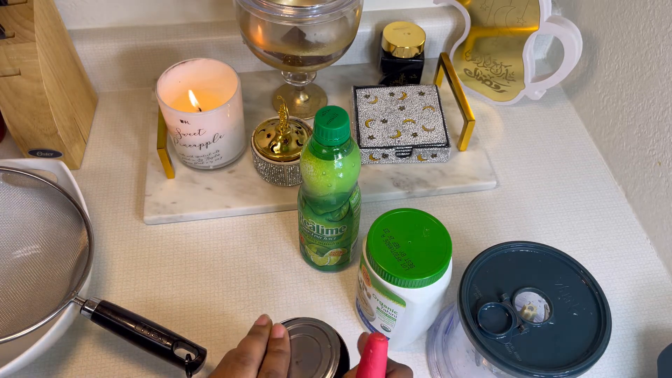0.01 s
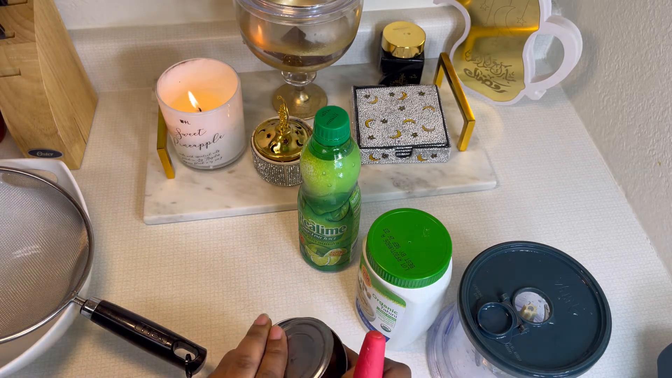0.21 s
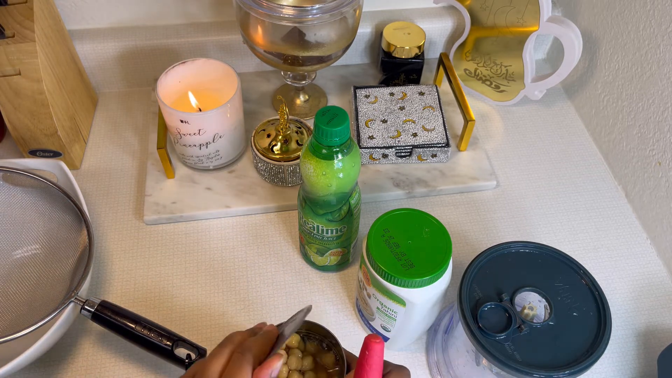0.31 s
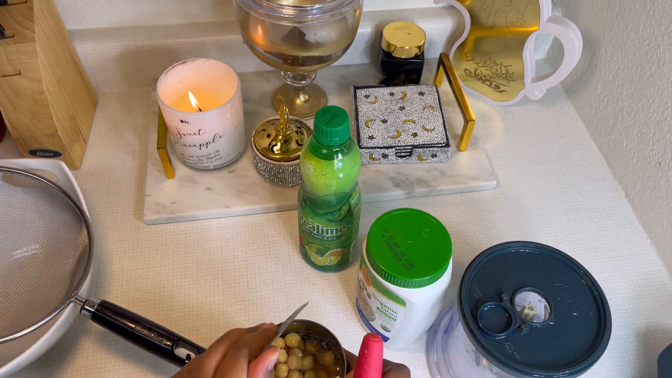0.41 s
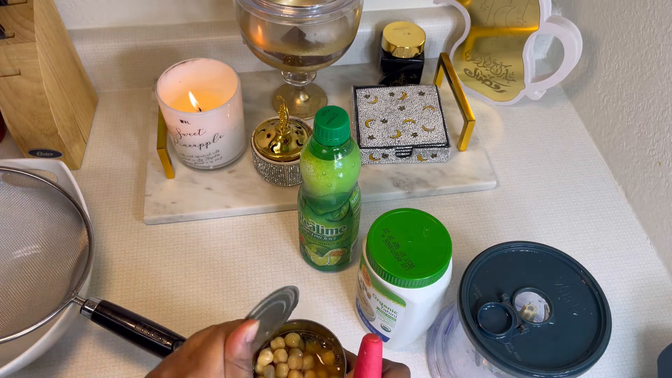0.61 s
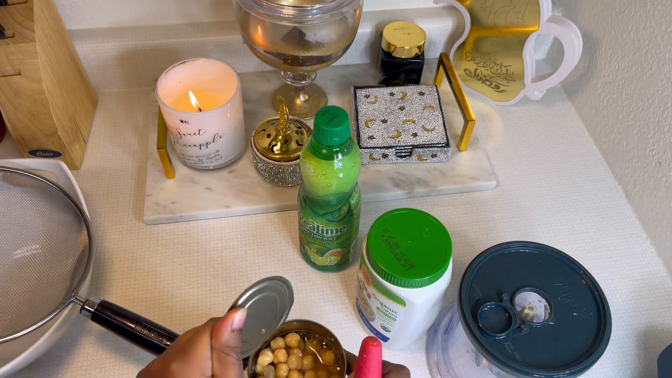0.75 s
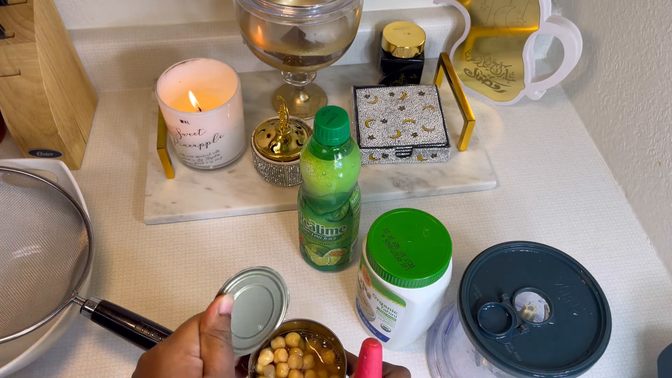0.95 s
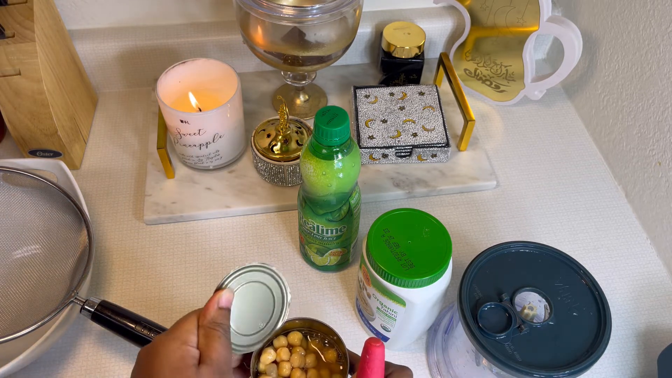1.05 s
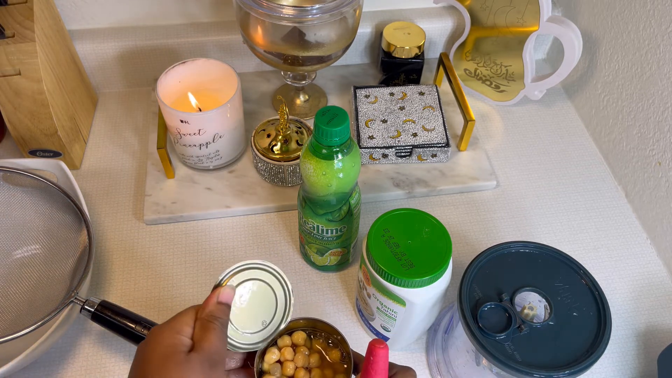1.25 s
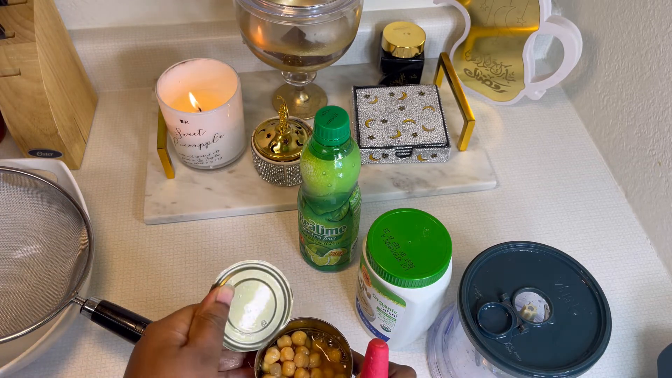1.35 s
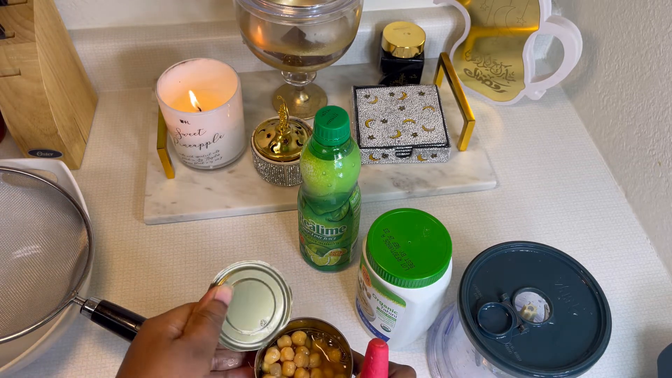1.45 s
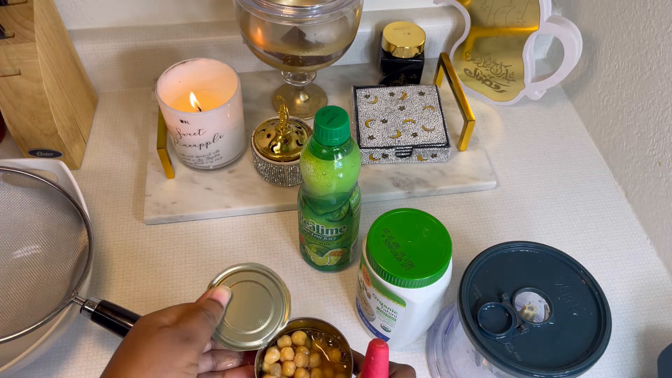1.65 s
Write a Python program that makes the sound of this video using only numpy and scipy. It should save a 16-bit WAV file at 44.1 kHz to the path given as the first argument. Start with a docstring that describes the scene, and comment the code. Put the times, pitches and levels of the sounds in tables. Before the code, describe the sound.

A can lid's last tab snaps as it is bent back, close to a stereo microphone in a quiet kitchen. Very faint touches come near 0.05 s; at 0.25 s a loud, sharp crack of several rapid jolts rings briefly with tearing grit, a low thump and decaying room echo. A soft tick and faint finger rub follow at 0.73-1.05 s, over low, wavering refrigerator hum and room tone to the end.

```python
"""The cut lid of a tin can is bent back by hand, close to a stereo microphone in a quiet kitchen: the last tab
of metal snaps in quick jolts of ringing lid modes and tearing noise. Swelling low modes thump through the
counter and the room answers with coloured, decaying noise. A finger ticks (puffs of noise) and rubs (clicks
through resonances) on the lid, over a refrigerator of one hum and narrow noise drones, and steady room tone."""
import sys
import numpy as np
from scipy import signal
from scipy.fft import rfft, irfft
from scipy.io import wavfile

SR = 44100
rng = np.random.default_rng(int(sys.argv[2]) if len(sys.argv) > 2 else 0)


def wrap_up_sound(samples):
    """Save the sound to the file named by the first command line argument, as 16-bit audio."""
    columns = np.atleast_2d(samples).T
    # keep every value between -1 and 1, then stretch to whole-number steps
    tamed = np.clip(columns, -1, 1)
    steps = np.round(tamed * 32767).astype(np.int16)
    wavfile.write(sys.argv[1], SR, steps)


N = 74970

# The tab tears in a few quick jolts. Each row: start in seconds, level in dB,
# tilt of the lid's ring in dB per octave around 3 kHz.
TAB_JOLTS = [(0.2454, -16, 4.5), (0.2468, -12, 0.4), (0.2482, -10.5, -0.26), (.24925, -11.5, 1.1),
             (0.2529, -17, 2), (0.257, -20, -3), (0.2644, -21.5, 0.58), (.26905, -26, -1.14)]
SNAP_S = TAB_JOLTS[0][0]  # the first jolt


def amp(db):
    """Linear gain for a level in dB."""
    return 10 ** (np.asarray(db) / 20)


def evened(x):
    """Scales to an RMS of 1 over all channels."""
    return x / np.sqrt(np.mean(x ** 2) + 1e-20)


def read(points, hz):
    """Reads a curve of (Hz, value) points, straight between them on a log frequency axis."""
    point_hz, value = np.transpose(points)
    return np.interp(np.log(hz + 1), np.log(point_hz + 1), value)


def since(s):
    """Seconds after the moment s, zero before it."""
    return np.maximum(np.arange(N) / SR - s, 0)


def sides(db):
    """Left and right gains for a left-right difference in dB."""
    return amp([[db / 2], [-db / 2]])


def coloured(x, db):
    """Filters by a gain curve db(hz)."""
    hz = np.fft.rfftfreq(N, 1 / SR)
    return irfft(rfft(x) * amp(db(hz)), N)


def resonate(x, hz, width):
    """One resonance of gain 1: shifts hz down to zero, smooths, and shifts back up."""
    turn = np.exp(2j * np.pi * hz * np.arange(N) / SR)
    r = np.exp(-np.pi * width / SR)
    smooth = signal.lfilter([1 - r], [1, -r], x / turn)
    return 2 * (turn * smooth).real


def swell(t, rise, t60):
    """Smooth rise, then exponential decay."""
    attack = np.sin(np.pi / 2 * np.minimum(t / rise, 1)) ** 2
    return attack * amp(-60 * np.maximum(t - rise, 0) / t60)


def pair():
    """White noise at two microphones, with likeness and left-right balance set by frequency."""
    # Each row: frequency in Hz, left-right likeness from -1 to 1.
    likeness = [(60, 1.0), (180, -0.12), (550, 0.028), (1640, -0.08), (4960, -0.06), (15000, -0.67)]
    # Each row: frequency in Hz, left-right difference in dB.
    balance = [(60, -0.5), (180, -8.5), (550, -1.0), (1640, -3), (4960, -6.5), (15000, 4)]
    hz = np.fft.rfftfreq(N, 1 / SR)
    a, b = rfft(rng.standard_normal((2, N)))
    same = np.clip(read(likeness, hz), -1, 1)
    spectra = np.array([a, same * a + np.sqrt(1 - same ** 2) * b])
    lean_db = read(balance, hz) * np.array([[.5], [-.5]])
    return irfft(spectra * amp(lean_db), N)


def snap():
    """Each jolt rings the lid's modes and throws a burst of grit; later jolts make slower contact."""
    # Ring of lid and can. Each row: frequency in Hz, level in dB, t60 in seconds,
    # left-right difference in dB, lead of the left in radians.
    lid_modes = [(466.7, -20.5, .05, -3, -1.02), (589, -15.5, 0.08, -2.5, -1.24), (975, -10, .08, -4, 1.68),
                 (1320, -1.5, 0.018, -1.5, 0.75), (1622, -5.5, .022, -5, 0.3), (2030, -6.5, 0.022, -3, 0),
                 (2250, -2.5, 0.038, -1.5, 0.54), (2580, -10, .03, -6.5, -2.7),
                 (3370, -9, .06, -6.5, -1.36), (4500, -16.5, .04, -6.5, 1.67), (6200, -22, .05, -7.5, 1.9),
                 (8800, -14.5, .025, -1, 1), (9300, -13, .02, -1, 1.3), (10900, -6, .014, 2.5, -3),
                 (11500, -14.5, .014, 0, -2)]
    # Grit of tearing metal. Each row: frequency in Hz, density in dB per Hz.
    grit_colour = [(180, -28.5), (300, 1.5), (767, -8.5), (2280, 0), (2920, -10.5), (3330, -12),
                   (4050, -13), (10000, -23), (11100, -10.5), (15400, -71.5)]
    grit_db, grit_t60, grit_same = -9, 0.043, 0.69  # level under the jolt, decay (s), left-right likeness
    first_contact_s, ring_s = 0.00026, .15
    softening = .03  # contact time grows by this many seconds per second as the tab gives way

    a, b = rng.standard_normal((2, N))
    grit = np.array([a, grit_same * a + np.sqrt(1 - grit_same ** 2) * b])
    grit = evened(coloured(grit, lambda hz: read(grit_colour, hz)))
    grit = sides(-3.5) * grit

    out = np.zeros((2, N))
    start = round(SNAP_S * SR) - 1
    span = slice(start, start + round(ring_s * SR))
    for s, jolt_db, tilt_db in TAB_JOLTS:
        t = since(s)[span]
        contact = first_contact_s + softening * (s - SNAP_S)
        for hz, db, t60, pan_db, lead in lid_modes:
            level_db = jolt_db + db + tilt_db * np.log2(hz / 3000)
            phase = np.array([[lead / 2], [-lead / 2]])
            ring = np.sin(2 * np.pi * hz * t + phase)
            out[:, span] += sides(pan_db) * amp(level_db) * swell(t, contact, t60) * ring
        out[:, span] += amp(jolt_db + grit_db) * swell(t, contact, grit_t60) * grit[:, span]
    return out


def thump():
    """Low modes of can and counter swell up after the first jolt, each at its own pace, and die away."""
    # Each row: frequency in Hz, peak level in dB, rise in seconds, t60 in seconds, left-right difference in dB.
    low_modes = [(52.7, -26, .037, .3, -2.5), (92, -20.5, .0217, .1, -3), (223, -19.5, .011, .05, -5),
                 (270, -32.5, .06, 0.12, 0)]
    t = since(.247)
    out = np.zeros((2, N))
    for hz, db, rise, t60, pan_db in low_modes:
        tone = np.cos(2 * np.pi * hz * (t - rise))
        out += sides(pan_db) * amp(db) * swell(t, rise, t60) * tone
    return out


def echo():
    """The room's dense answer to the snap: coloured noise, each band dying at its own speed."""
    # Colour a tenth of a second after the snap. Each row: frequency in Hz, density in dB per Hz.
    answer_colour = [(59, -28), (100, -2), (188, -13.5), (275, -3), (319, -17), (354, -11), (447, -19.5),
                     (529, -11), (858, -18.5), (1180, -16), (1550, -17.5), (3170, -19), (6910, -31),
                     (7360, -37.5), (8720, -23.5), (10100, -41.5), (11500, -28), (12500, -75),
                     (15400, -90.5)]
    # Decay of the kitchen. Each row: frequency in Hz, t60 in seconds.
    room_decay = [(100, .45), (400, .45), (1200, 0.7), (3000, .55), (7000, .5), (12000, .45)]
    level_db, rise_s = -15, .012
    bend = 1.1  # above 1 the tail falls faster as it goes

    hz, t, bands = signal.stft(pair(), SR, nperseg=256)
    tenths = np.maximum(t - SNAP_S, 0) * 10  # tenths of a second after the snap
    decay_db = -6 * (tenths ** bend - 1) / read(room_decay, hz)[:, None]
    tail = signal.istft(bands * amp(decay_db), SR, nperseg=256)[1][:, :N]
    tail = coloured(tail, lambda hz: read(answer_colour, hz))
    onset = np.minimum(since(SNAP_S) / rise_s, 1) ** 2
    return amp(level_db) * tail * onset


def ticks():
    """Light touches on the lid: short puffs of grainy noise around a centre pitch."""
    # Each row: start in seconds, level in dB, centre in Hz, width in octaves, rise in seconds, t60 in seconds.
    touches = [(.020, -74.5, 8300, .3, 0.014, .15), (0.0506, -53.5, 10600, .45, 0.0009, 0.017),
               (.053, -69.5, 9770, .3, 0.0068, .15), (.035, -66.5, 3980, 1.6, 0.016, 0.13),
               (0.057, -51, 400, 1.93, 0.0033, .08), (0.725, -57.5, 1840, 0.36, 0.0009, .05),
               (.726, -70, 5200, 0.31, 0.00099, 0.15), (.94, -84, 8860, 0.23, 0.043, 0.51),
               (1.09, -79.5, 8870, .25, 0.073, 0.13)]
    out = np.zeros((2, N))
    for s, db, hz, octaves, rise, t60 in touches:
        noise = rng.standard_normal((2, N))
        grain = coloured(noise, lambda f: -12 * (np.log2((f + 1) / hz) / octaves) ** 2)
        out += amp(db) * evened(grain) * swell(since(s), rise, t60)
    return out


def rub():
    """A finger slides on the lid: random stick-slip clicks ring a few damped bands of the held metal."""
    # Each row: time in seconds, level in dB.
    slide_level = [(0.74, -86), (0.752, -73), (0.774, -55.5), (0.852, -68), (0.904, -61.5), (0.92, -65),
                   (1.004, -70), (1.052, -80), (1.06, -83.5)]
    # Each row: frequency in Hz, width of each of two passes in Hz, level in dB.
    lid_bands = [(1860, 200, -5.5), (2200, 100, -9), (3800, 320, -19), (5200, 320, -24), (429.2, 30, 3.5)]
    slips_per_s = 2500  # on average
    slips = rng.standard_normal((2, N)) * (rng.random(N) < slips_per_s / SR)
    ring = np.zeros((2, N))
    for hz, width, db in lid_bands:
        band = resonate(resonate(slips, hz, width), hz, width)
        ring += amp(db) * evened(band)
    t, db = np.transpose(slide_level)
    level = amp(np.interp(np.arange(N) / SR, t, db, -120, -120))
    return sides(-5.5) * ring * level


def fridge():
    """A clean hum that swells and sinks, and the compressor's wavering drones: noise in narrow resonances."""
    # Each row: time in seconds, RMS level of the hum in dB.
    hum_level = [(0.0, -51.5), (0.142, -74), (0.42, -47.5), (0.634, -49), (0.724, -47.5), (0.884, -52),
                 (0.97, -59.5), (1.234, -64), (1.31, -47.5), (1.438, -50), (1.482, -50), (1.7, -44.5)]
    # Each row: frequency in Hz, width of each of two passes in Hz, level in dB.
    drone_bands = [(95, 10, -62.5), (118, 8, -61.5), (167.4, 18, -63.5), (230.2, 6, -59), (255.5, 6, -65),
                   (296, 5, -71.5), (326, 5, -68), (420, 47, -64), (698, 35, -66.5), (1230, 60, -77.5),
                   (3600, 300, -84.5)]
    hum_hz = 59.4
    now = np.arange(N) / SR
    t, db = np.transpose(hum_level)
    hum = np.sqrt(2) * amp(np.interp(now, t, db)) * np.sin(2 * np.pi * hum_hz * now)
    out = sides(-2.5) * hum
    for hz, width, db in drone_bands:
        a, b = rng.standard_normal((2, N))
        noise = np.array([a, .7 * a + 0.48 * b])  # partly alike left and right
        drone = resonate(resonate(noise, hz, width), hz, width)
        out += sides(-2.0) * amp(db) * evened(drone)
    return out


def air():
    """Steady room tone: coloured noise, falling away steeply in the deep bass."""
    # Each row: frequency in Hz, density in dB per Hz.
    tone_colour = [(15, -29), (25, -8.5), (64, -7), (107, -11.5), (183, -20.5), (245, -13), (367, -14.5),
                   (443, -17.5), (565, -20), (700, -16), (801, -23.5), (1260, -28), (2170, -41.5),
                   (3510, -46.5), (4350, -54), (9000, -54.5), (15400, -77.5)]
    level_db, low_cut_hz = -53, 46

    def colour_db(hz):
        cut_db = -10 * np.log10(1 + (low_cut_hz / (hz + 1)) ** 12)
        return read(tone_colour, hz) + cut_db

    return amp(level_db) * evened(coloured(pair(), colour_db))


def scene():
    """All layers together, from the snap to the room tone."""
    return snap() + thump() + echo() + ticks() + rub() + fridge() + air()


def record(dry):
    """Soft overload towards a ceiling, then the band limit."""
    ceiling, edge_hz = 1.1, 15500
    soft = ceiling * np.tanh(dry / ceiling)
    soft = np.pad(soft, ((0, 0), (255, 255)), "reflect")  # room for the filter at both ends
    low_pass = signal.firwin(511, edge_hz, window=("kaiser", 9), fs=SR)
    return signal.oaconvolve(soft, low_pass[None], "valid")


dry = scene()
out = record(dry)
wrap_up_sound(out)
```